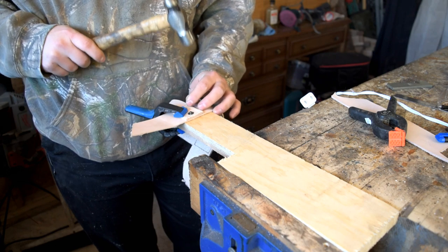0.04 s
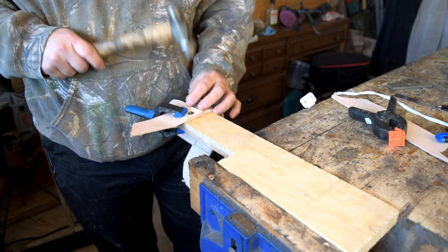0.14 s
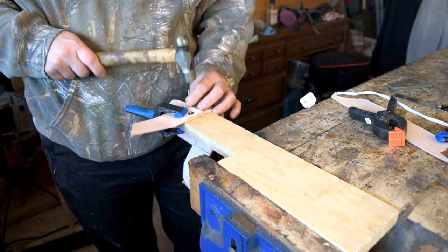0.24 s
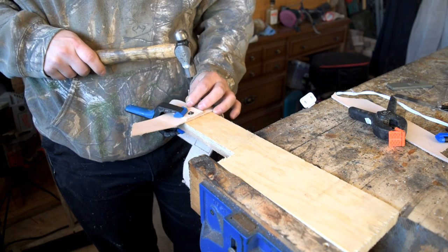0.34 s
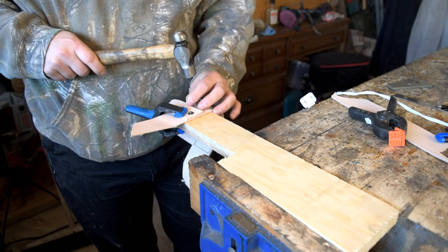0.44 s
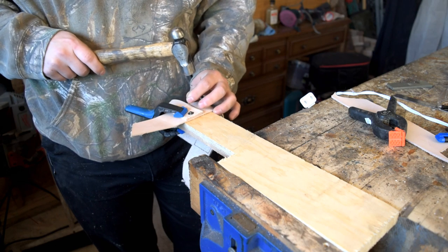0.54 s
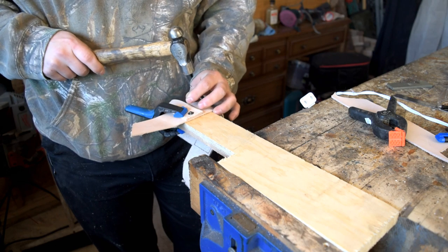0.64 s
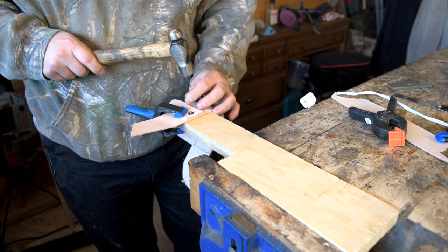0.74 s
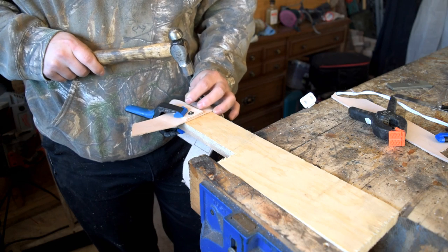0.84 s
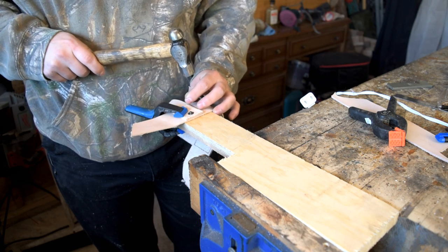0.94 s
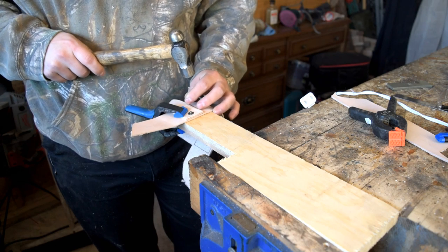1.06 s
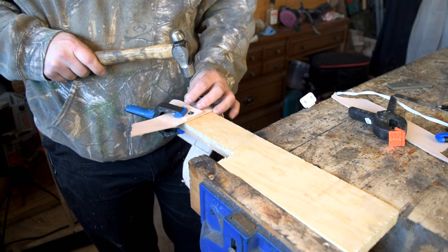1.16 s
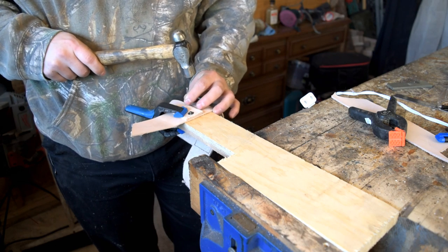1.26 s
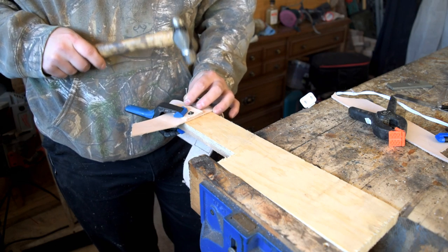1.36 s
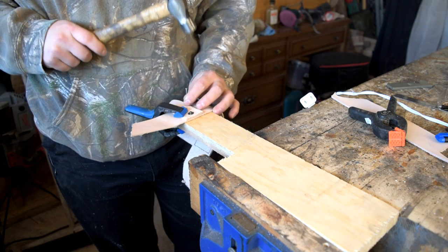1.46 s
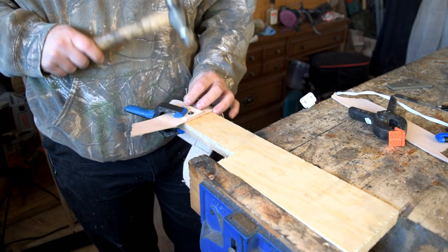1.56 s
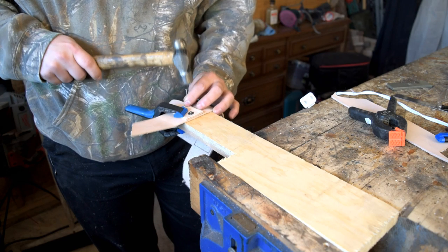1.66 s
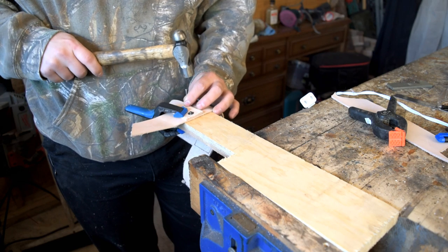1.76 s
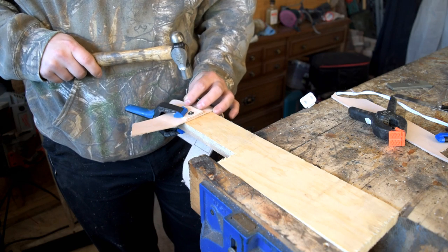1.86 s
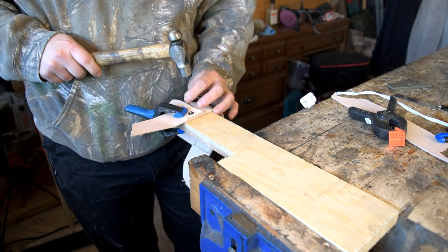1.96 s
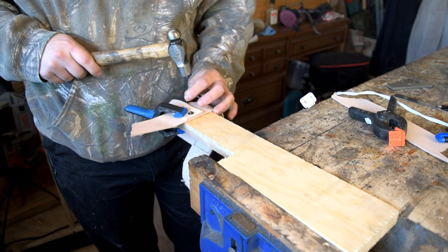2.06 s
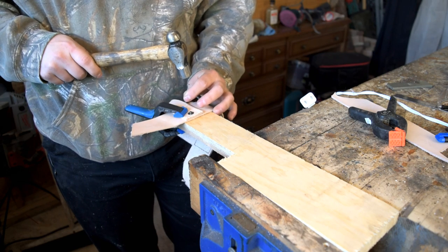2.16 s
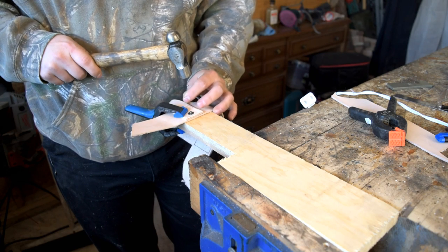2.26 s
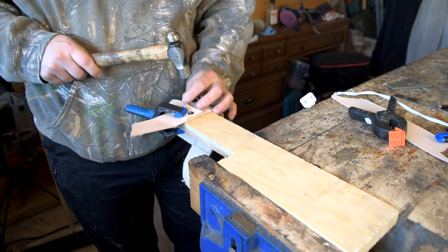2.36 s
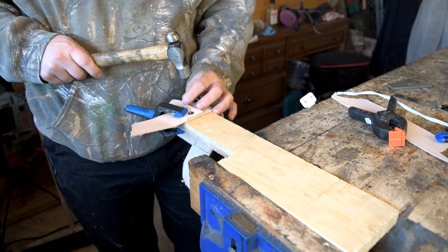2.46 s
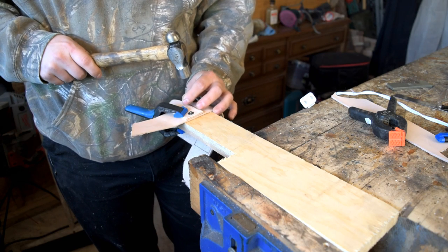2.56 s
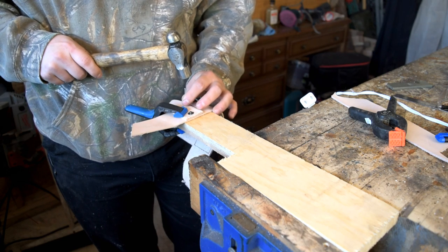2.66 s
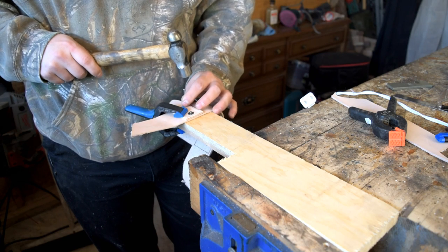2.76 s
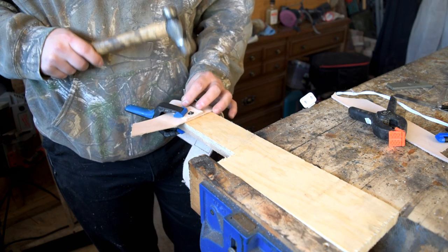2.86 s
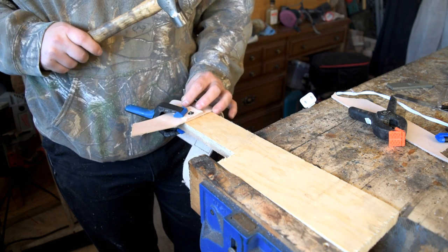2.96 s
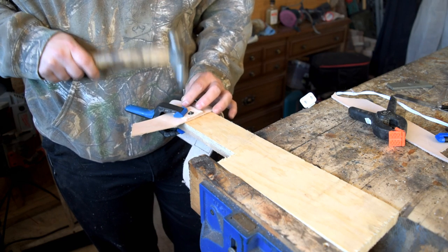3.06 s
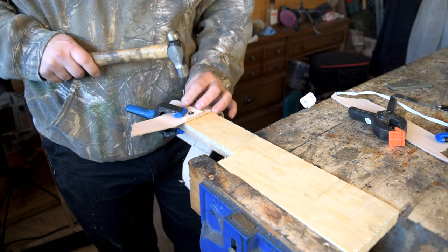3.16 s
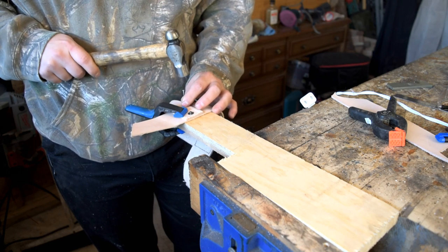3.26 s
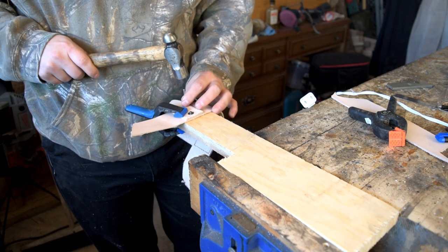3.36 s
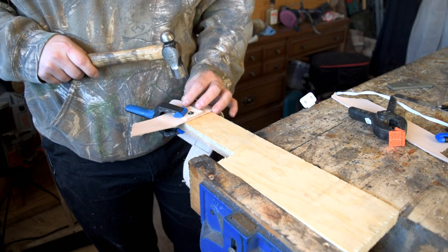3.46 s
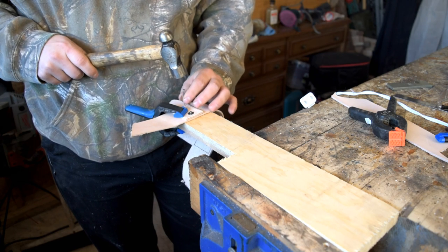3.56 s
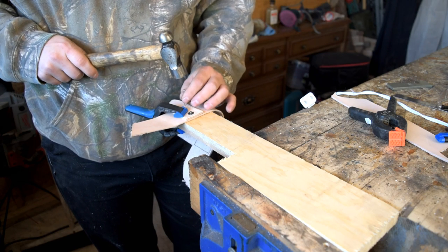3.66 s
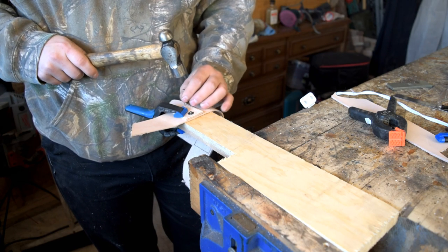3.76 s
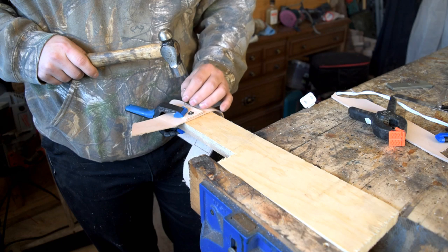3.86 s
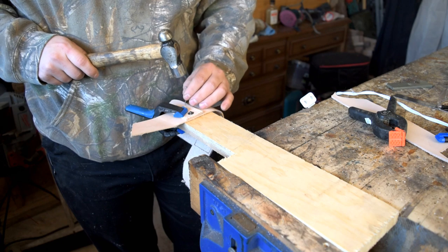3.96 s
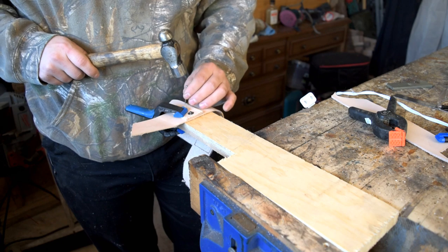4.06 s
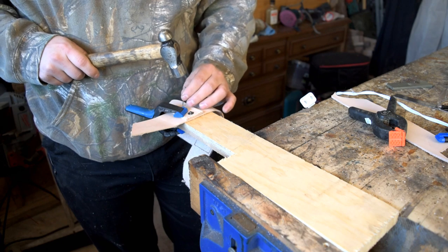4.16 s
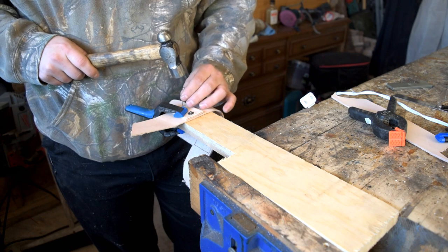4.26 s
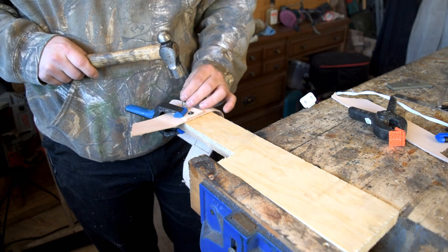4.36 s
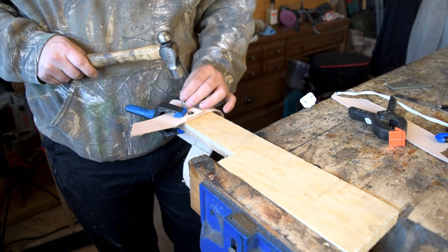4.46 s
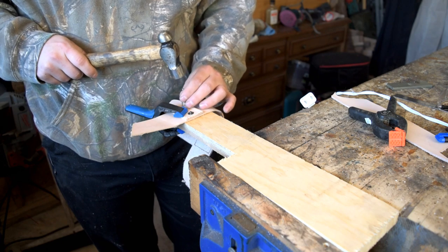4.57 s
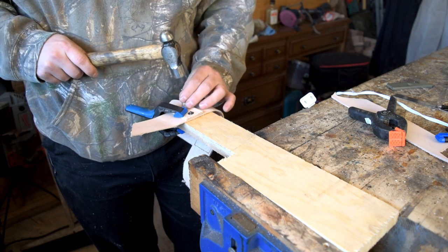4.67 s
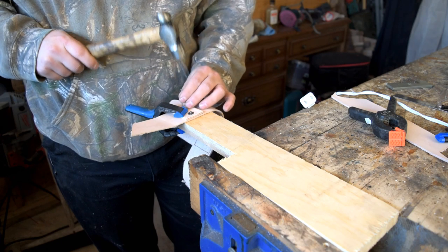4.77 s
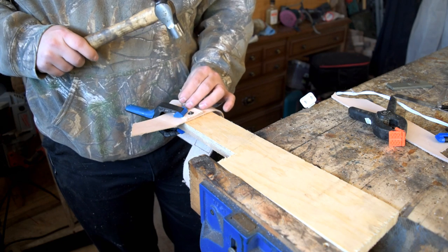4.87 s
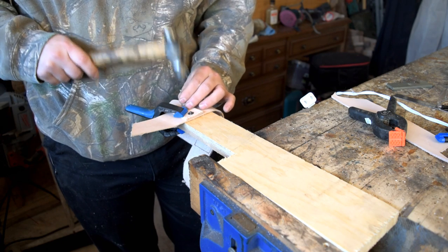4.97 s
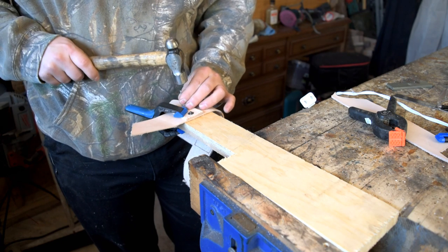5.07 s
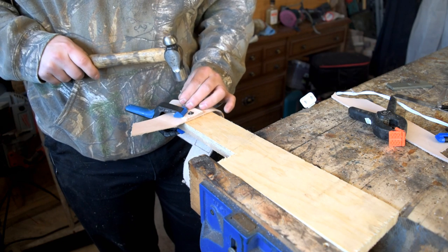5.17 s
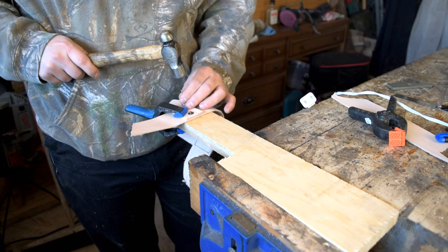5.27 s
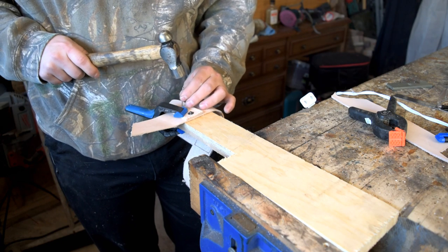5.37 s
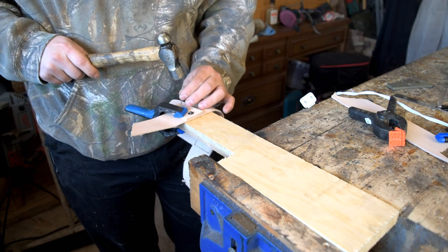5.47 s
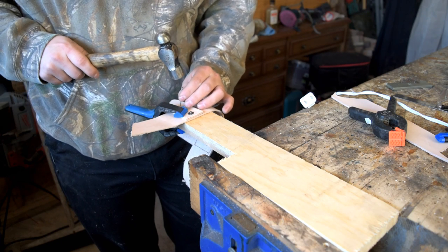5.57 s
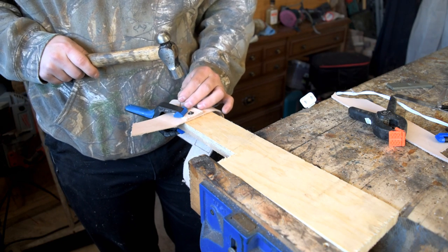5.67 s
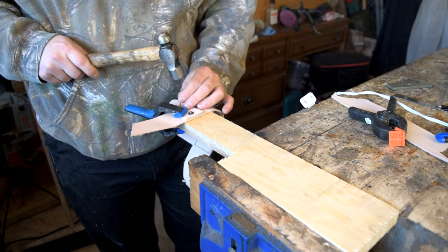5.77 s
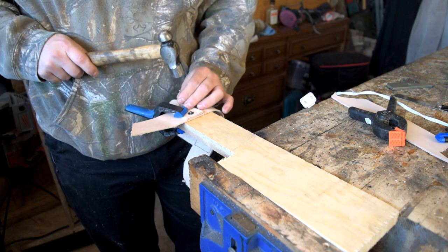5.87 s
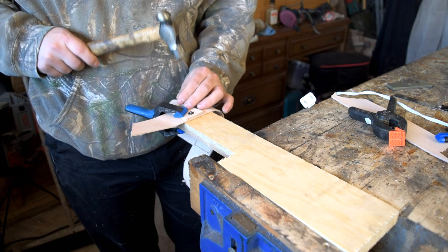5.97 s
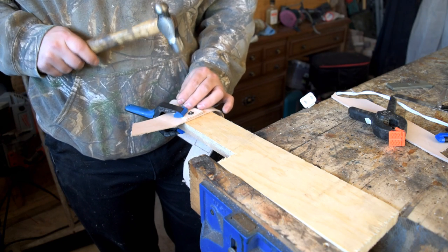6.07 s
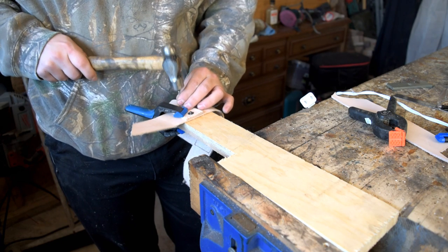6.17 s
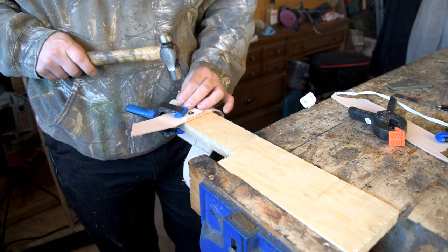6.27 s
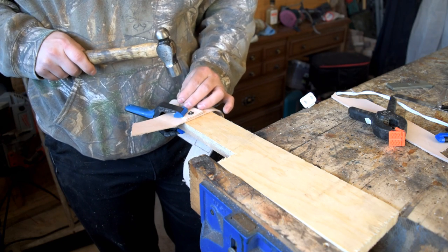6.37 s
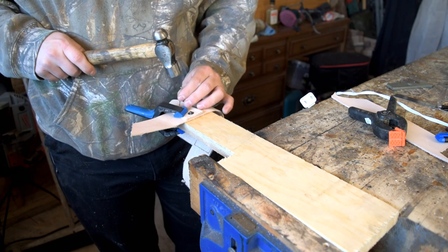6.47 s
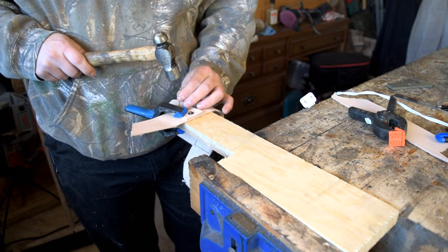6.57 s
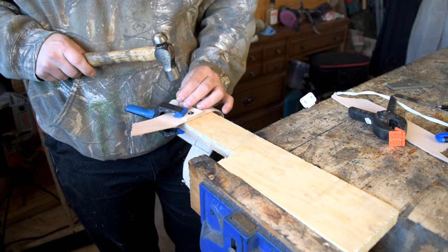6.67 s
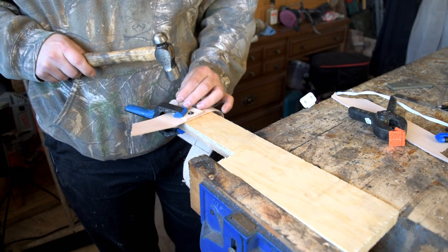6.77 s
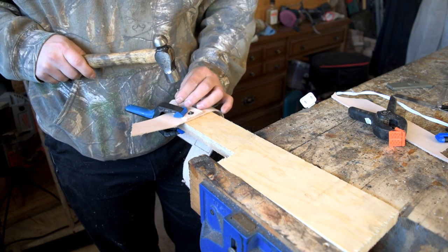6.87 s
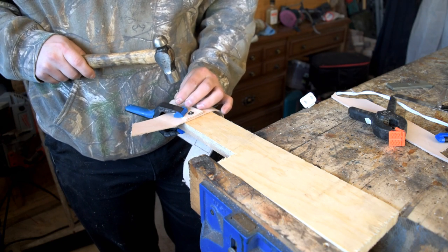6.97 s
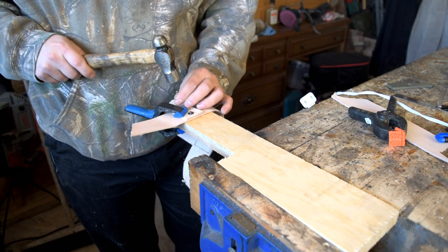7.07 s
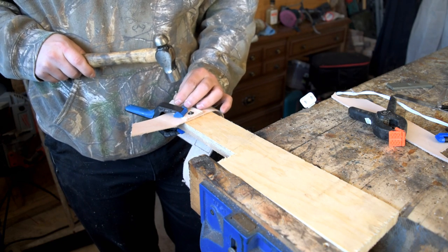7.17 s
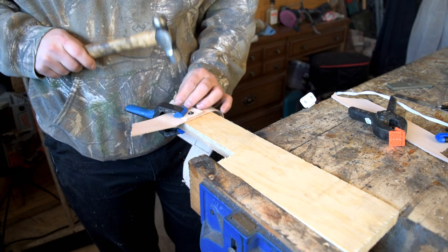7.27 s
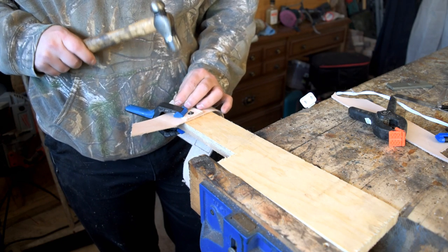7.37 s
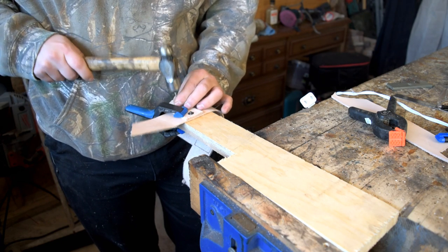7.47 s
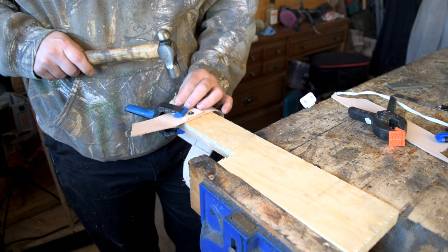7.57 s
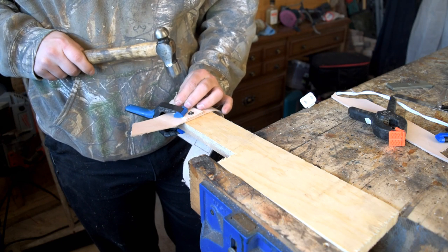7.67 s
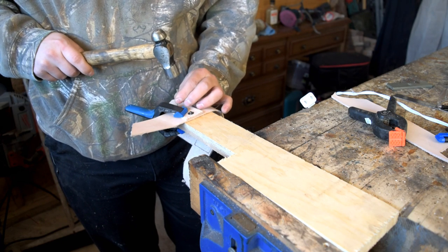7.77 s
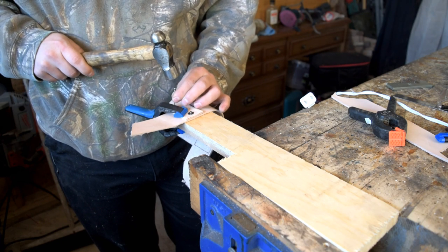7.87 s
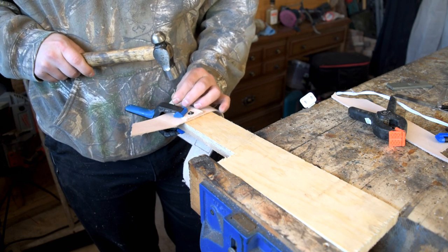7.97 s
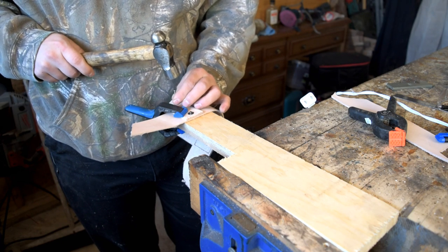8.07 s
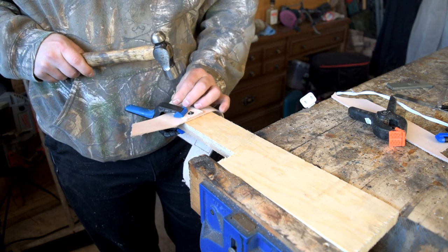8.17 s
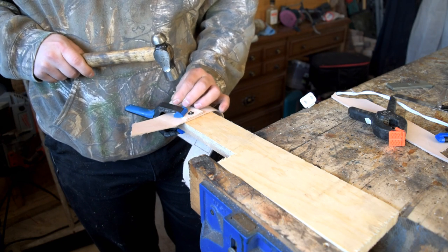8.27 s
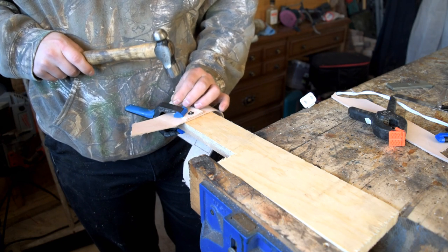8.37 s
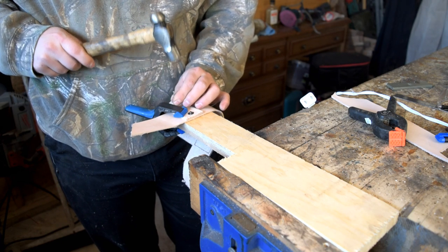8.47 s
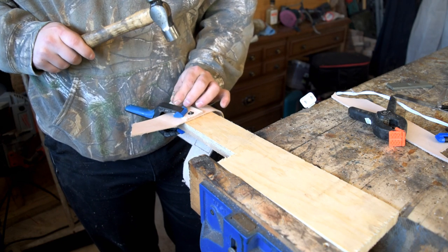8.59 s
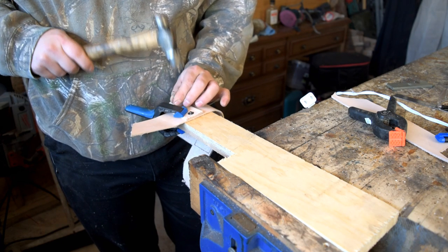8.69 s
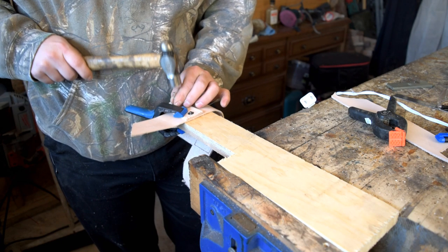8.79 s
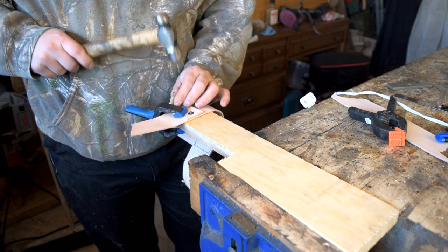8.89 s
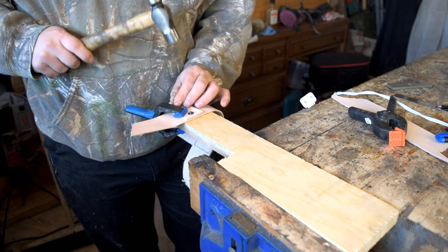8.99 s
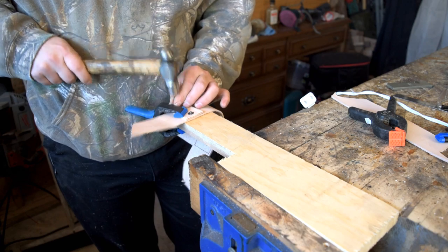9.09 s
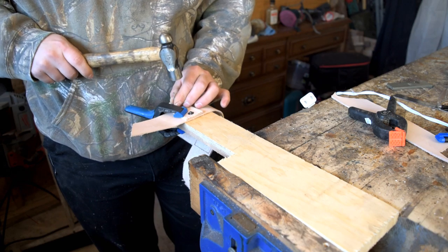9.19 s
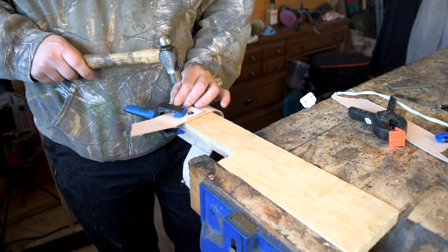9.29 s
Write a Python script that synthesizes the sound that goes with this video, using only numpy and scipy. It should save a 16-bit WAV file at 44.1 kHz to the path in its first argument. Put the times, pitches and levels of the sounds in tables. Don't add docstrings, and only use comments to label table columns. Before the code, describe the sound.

A small steel hammer drives a nail through leather into a vice-held board, sharp steady knocks with chattering rattle and faint taps between.

```python
import sys
import numpy as np
from scipy import signal
from scipy.fft import rfft, irfft
from scipy.io import wavfile
from scipy.ndimage import uniform_filter1d

SR = 44100
rng = np.random.default_rng(int(sys.argv[2]) if len(sys.argv) > 2 else 0)


def voltage_ratio(level):
    return 10 ** (np.asarray(level, float) / 20)


def output_pcm(signal):
    pcm = np.clip(np.atleast_2d(signal).T, -1, 1) * 32767
    wavfile.write(sys.argv[1], SR, np.round(pcm).astype(np.int16))


N = 411453
SPAN = int(1.2 * SR)
T = np.arange(SPAN) / SR

# t/s, force/dB, landing brightness/dB, head ring/dB, steel crack/dB
BLOWS = [
    (0.226, 2, 3, 6.5, -6.5),
    (1.661, 2.5, 3, 5.5, -5),
    (3.111, 2.5, 6.5, 7.5, -6),
    (5.029, -3, 1, -17, -3),
    (6.173, 1, 2.5, 8.5, -8.5),
    (7.477, 2.5, 5, 8, -8.5),
    (8.775, -8.5, -3.5, -11, -12),
    (9.112, 2, 0.5, 4, -6),
]
# f/Hz, level/dB, t60/s
BOARD = [(280, -5.5, 0.067), (388.7, -8, 0.21), (525, -12.5, 0.2), (650.5, -7.5, 0.14), (771, -4, 0.099),
         (896, 4, 0.036), (1042, -8, 0.25), (1180, -7.5, 0.18), (1366, -5, 0.043), (1600, -10.5, 0.039),
         (1766, -1.5, 0.067), (1965, -7.5, 0.077), (2364, -4, 0.056), (2827, -15, 0.099), (3300, -32, .05),
         (3920, -36.5, 0.14), (4500, -14, 0.036)]
# f/Hz, width/Hz, level/dB
FACE = [(822, 260, 1), (1842, 160, -9.5), (2960, 100, -9.5), (3410, 160, -10.5), (4200, 180, -20.5),
        (4990, 190, -17)]
# f/Hz, level/dB, t60/s
TOP = [(136, -11.5, 0.15), (145.7, -17.5, 0.29), (164.7, -20, 0.58), (204.5, -15, 0.26), (329, -17, 0.1)]


def colour(x, table):
    hz, db = np.transpose(table)
    f = np.maximum(np.arange(len(x) // 2 + 1) * SR / len(x), 1)
    gain = voltage_ratio(np.interp(np.log(f), np.log(hz), db))
    return irfft(rfft(x) * gain, len(x))


def filtered(x, order, hz, kind="low"):
    return signal.sosfilt(signal.butter(order, hz, kind, fs=SR, output="sos"), x)


def unit(x):
    return x / np.sqrt(np.mean(x ** 2))


def fade(t60):
    return 1000. ** (-T / t60)


def ring(modes, scatter_db, detune):
    out = np.zeros(SPAN)
    for hz, db, t60 in modes:
        level_draw, pitch_draw, sign_draw = rng.standard_normal(3)
        t = T[:int(2 * t60 * SR)]
        level = np.sign(sign_draw) * voltage_ratio(db + scatter_db * level_draw)
        wave = np.sin(2 * np.pi * hz * (1 + detune * pitch_draw) * t)
        out[:len(t)] += level * wave * fade(t60)[:len(t)]
    return out


def push(x, contact_s):
    pulse = np.hanning(int(contact_s * SR) + 3)
    return signal.fftconvolve(x, pulse / pulse.sum())[:len(x)]


def add(out, x, s):
    i = int(s * SR)
    out[i:i + len(x)] += x[:N - i]


def crack(hz, t60):
    burst = rng.standard_normal(SPAN) * fade(t60)
    return filtered(burst, 3, [hz / 1.95, hz * 1.286], "band")


def air():
    # f/Hz, level/dB per Hz
    hush = [(12, -27), (20, 6.5), (53, -1.5), (96, -5.5), (163, -8), (293, -12.5), (388, -16.5), (513, -18),
            (1060, -22.5), (1290, -23.5), (2670, -28), (8890, -31.5), (16000, -32.5)]
    quiet = unit(colour(rng.standard_normal(N), hush))
    rumble = filtered(quiet, 2, 300)
    drift = uniform_filter1d(rng.standard_normal(N), SR // 5)
    swell_db = 0.5 * unit(uniform_filter1d(drift, SR // 5))
    return voltage_ratio(-47.5) * (quiet + rumble * (voltage_ratio(swell_db) - 1))


def taps():
    # t/s, peak/dB, brightness/dB, hollow knock/dB
    settings = [(0.171, -44.5, 11.5, 3), (0.485, -27, -10, -6), (1.314, -16, 3.5, -2.5),
                (1.938, -28.5, -3, -15), (1.969, -31.5, -4, -4), (2.742, -22, 0, -1), (3.557, -34.5, -8, 5),
                (3.68, -28, -5, -12), (3.985, -26.5, -8, -12), (4.693, -38, 5.5, 2.5),
                (5.339, -32.5, -5, -9), (5.475, -55, 13, 6.5), (5.881, -38, 2, -4), (6.783, -45, -14, -10),
                (6.812, -39.5, 0, -9), (6.871, -50.5, 14.5, -5), (7.739, -39.5, -2, 4.5),
                (7.783, -32.5, 0.5, -6), (8.288, -47.5, 11, 2), (8.494, -41, -7, -7)]
    # f/Hz, level/dB, t60/s
    light = [(155, -13, .2), (375, -7, .16), (530, -9, .09), (820, -4, .06), (915, 0, .06), (1120, -12, .1),
             (1400, -14, .08), (1600, -13, .08), (1776, -15, .07), (2370, -17, .06), (2750, -21, .05),
             (3300, -23, .05), (3741, -23, .05)]
    ring_share = 0.59
    face_db = -2.5
    out = np.zeros(N)
    for s, db, bright_db, hollow_db in settings:
        tilted = []
        for hz, d, t60 in light:
            if hz < 700:
                tilted.append((hz, d + hollow_db, t60))
            else:
                tilted.append((hz, d + bright_db * (hz > 1000), ring_share * t60))
        face = [(hz, d + face_db + bright_db * (hz > 1000), 2.2 / width) for hz, width, d in FACE]
        knock = push(ring(tilted, 1.5, 0.034), 0.00049)
        knock += push(ring(face, 2.5, .015), .00015)
        knock *= 1 - np.exp(-T / 0.00089)
        scuff = voltage_ratio(db + bright_db - 2) * crack(2380, 0.039)
        add(out, voltage_ratio(db - 2) * knock + scuff, s - .001)
    return out


def workshop(x):
    # f/Hz, t60/s
    room = [(100, 0.62), (280, 0.4), (740, 0.33), (1940, 0.25), (5100, 0.2), (13500, 0.067)]
    hz, t60 = np.transpose(room)
    tail = np.zeros(SPAN)
    for f in 100 * 2 ** np.arange(0, 7.5, .5):
        band = filtered(rng.standard_normal(SPAN), 2, [f / 2 ** 0.31, f * 2 ** .25], "band")
        tail += band * fade(np.interp(np.log(f), np.log(hz), t60))
    tail *= 1 - np.exp(-T / 0.0042)
    return signal.fftconvolve(x, tail / np.sqrt(np.sum(tail ** 2)))[:N]


def blows():
    # f/Hz, level/dB, t60/s
    frame = [(53.52, -11, 0.89), (61, -25, 0.35), (45.5, -16, .5)]
    out = np.zeros(N)
    pinned = [(hz, db + 3 * np.log2(hz / 1000), .22 * t60) for hz, db, t60 in BOARD]
    face = [(hz, db, 2.4 / width) for hz, width, db in FACE]
    for s, db, _, _, crack_db in BLOWS:
        knock = voltage_ratio(-9) * ring(pinned, 2., .03) + voltage_ratio(-3) * ring(face, 1., .015)
        knock = push(knock, .00012)
        knock *= voltage_ratio(min(db + 9, 4)) / np.abs(knock).max()
        linger = push(ring(BOARD, 1.4, 0.019), 0.00093) * np.exp(-T / 0.14)
        linger *= voltage_ratio(-7 + .3 * db)
        thump = voltage_ratio(-2.5 + .1 * db) * ring(frame, 0.63, .01) * (1 - np.exp(-T / 0.028))
        thump += voltage_ratio(-3 - .1 * db) * push(ring(TOP, 1.2, 0.019), 0.0021)
        steel = voltage_ratio(crack_db) * crack(9000, 0.0077)
        buzz = voltage_ratio(-9) * crack(3200, 0.096)
        add(out, knock + linger + thump + steel + buzz, s - .0003)
    return out


def landings():
    # f/Hz, level/dB, t60/s
    head_modes = [(7530, -31, .1), (7560, -32, .09), (7640, -38, .05), (7430, -39, .05), (8300, -46, .06),
                  (12350, -47, .04), (12200, -42, .07), (12900, -52, .05)]
    # f/Hz, level/dB per Hz
    chatter = [(60, -26), (150, -9.5), (460, -21.5), (920, -14.5), (1840, -18), (4050, -21.5),
               (6900, -39.5), (8300, -34.5), (10000, -44.5), (15000, -83.5)]
    bounce_s, burst_s, burst_share = .0205, 0.0058, 0.78
    out = np.zeros(N)
    loose = [(hz, db, .16 * t60) for hz, db, t60 in BOARD]
    loose += [(hz, db + 7, 2.2 / width) for hz, width, db in FACE[:2]]
    for s, db, bright_db, ring_db, _ in BLOWS:
        flight_s = .030 + .0006 * db
        chatter_s = max(0.035 + 0.0024 * db, .005)
        bursts = uniform_filter1d(np.exp(-(T % bounce_s) / burst_s), size=130)
        bounce = 1 - burst_share * (1 - bursts)
        onset = 1 - np.exp(-(T / 0.001) ** 2)
        shape = onset * (np.exp(-T / chatter_s) + 0.13 * np.exp(-T / 0.0022)) * bounce
        size = voltage_ratio(1.6 * rng.exponential(size=SPAN)) * rng.standard_normal(SPAN)
        struck = rng.random(SPAN) < 8000 / SR
        clicks = shape * unit(size * struck)

        tilted = [(hz, d + bright_db * np.log2(hz / 1000) / 3) for hz, d in chatter]
        direct = colour(clicks, tilted)
        spot = rng.integers(3, size=SPAN)
        board = np.zeros(SPAN)
        for k in range(3):
            answer = ring(loose, 1.5, .03)[:SPAN // 8]
            board += signal.fftconvolve(clicks * (spot == k), answer)[:SPAN]
        shake = clicks / np.sqrt(np.sum(clicks ** 2))
        head = signal.fftconvolve(shake, ring(head_modes, 1.5, .0005))[:SPAN]
        top = signal.fftconvolve(clicks, ring(TOP, 1.5, 0.018))[:SPAN]

        body = unit(direct) + voltage_ratio(2.5) * unit(board) + voltage_ratio(-7.5) * unit(top)
        body *= voltage_ratio(-34 + 0.58 * db)
        add(out, (body + voltage_ratio(ring_db) * head) * (T < .8), s + flight_s)
    return out


def rustles():
    # t/s, length/s, level/dB, f/Hz, width/Hz
    scuffs = [(1.357, 0.016, -41.5, 4500, 9000), (2.72, 0.031, -66, 2500, 4000),
              (2.861, 0.27, -61.5, 5840, 8000), (3.507, 0.05, -53.5, 3300, 1800),
              (3.618, 0.11, -61.5, 2880, 1400), (3.95, 0.032, -54, 1790, 3000),
              (6.87, 0.0034, -38, 3300, 1600), (7.759, .03, -55, 3000, 2000), (7.93, .03, -58, 3000, 1600),
              (8.342, .07, -62, 2900, 1000), (8.35, .05, -54.5, 897, 500), (8.488, 0.091, -58, 897, 400),
              (8.533, .03, -62, 2920, 500)]
    out = np.zeros(N)
    for s, length, db, hz, width in scuffs:
        grain = rng.standard_normal(SPAN) * voltage_ratio(rng.exponential(size=SPAN))
        band = signal.filtfilt(*signal.iirpeak(hz, hz / width, SR), grain)
        shape = (1 - np.exp(-T / 0.0021)) * np.exp(-(T / length) ** 2)
        add(out, voltage_ratio(db) * unit(band) * shape, s)
    return out


def scene():
    hit, land, small = blows(), landings(), taps() + rustles()
    dull = filtered(hit, 1, 1800)
    to_room = voltage_ratio(-13.5) * dull + voltage_ratio(-8.0) * land + voltage_ratio(-12.0) * small
    sound = hit + land + small + workshop(to_room)
    ahead_s, release_s = .01, .012
    early = np.roll(filtered(sound, 2, 300, "high"), -int(ahead_s * SR))
    power = signal.lfilter([1], [1, -np.exp(-1 / (release_s * SR))], early ** 2)
    loud = np.sqrt(power / (release_s * SR))
    return (sound + air() / (1 + (loud / voltage_ratio(-24)) ** 2))[None]


def band_limit(x):
    return signal.sosfilt(signal.butter(12, 15750, fs=SR, output="sos"), x)


def record(dry):
    mix = np.clip(dry, -.99, .99)
    return band_limit(mix)


dry = scene()
out = record(dry)
output_pcm(out)
```